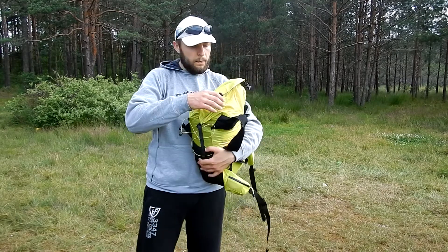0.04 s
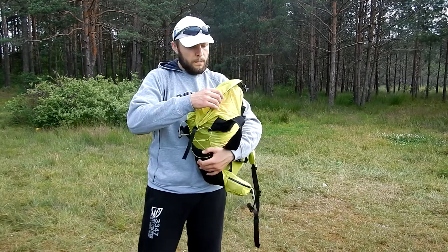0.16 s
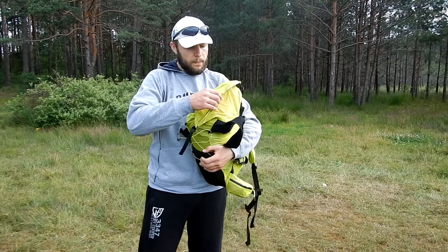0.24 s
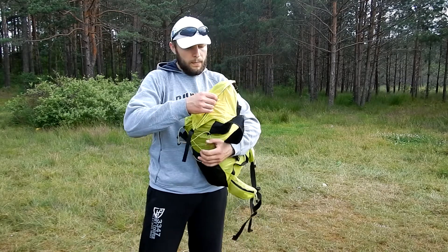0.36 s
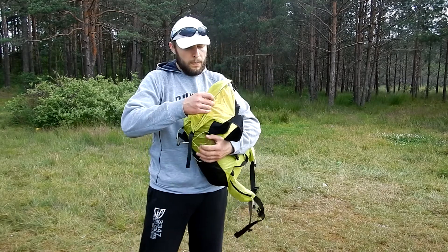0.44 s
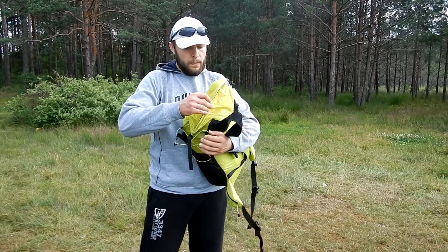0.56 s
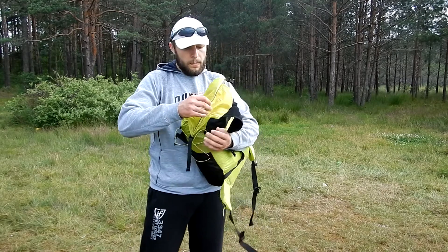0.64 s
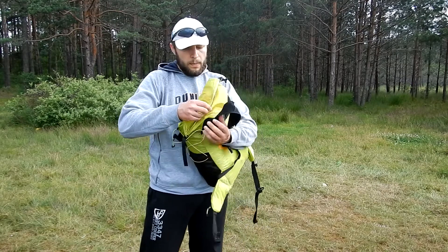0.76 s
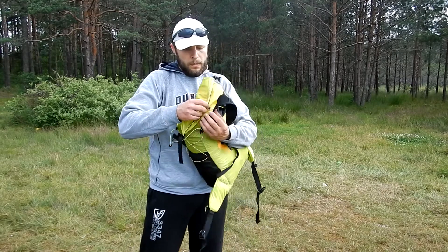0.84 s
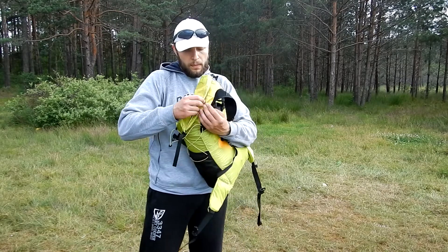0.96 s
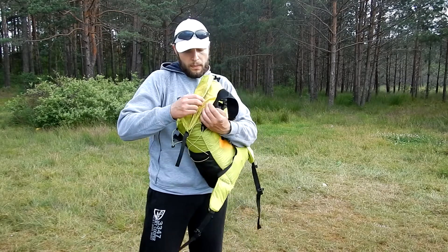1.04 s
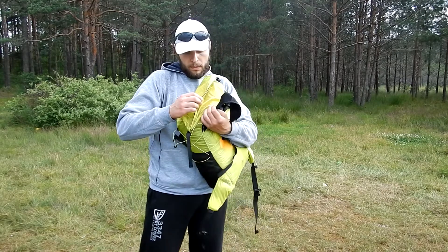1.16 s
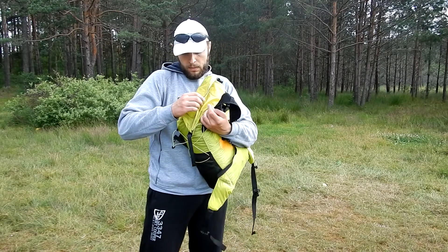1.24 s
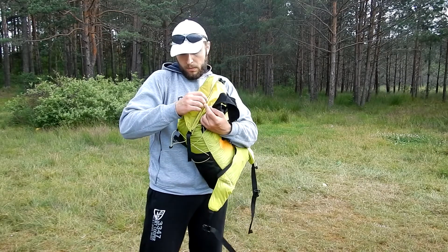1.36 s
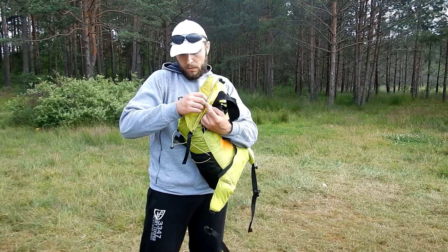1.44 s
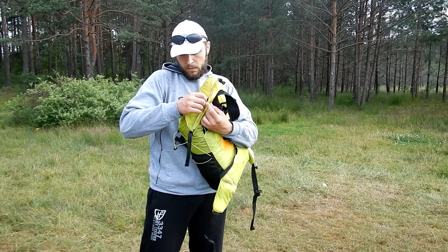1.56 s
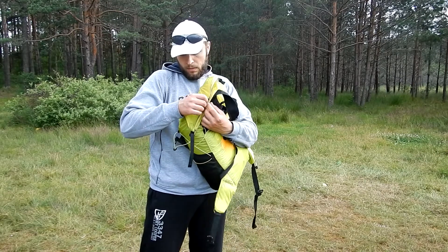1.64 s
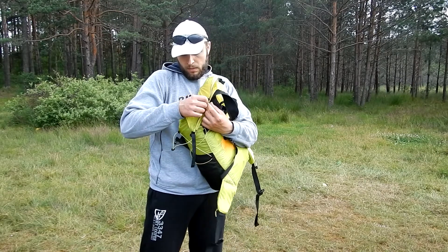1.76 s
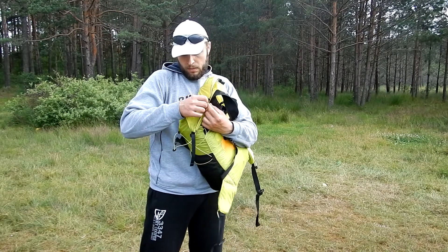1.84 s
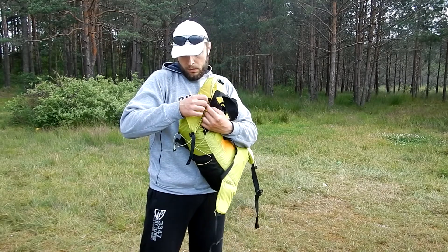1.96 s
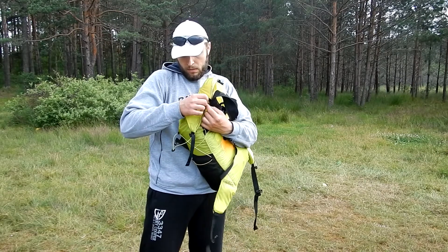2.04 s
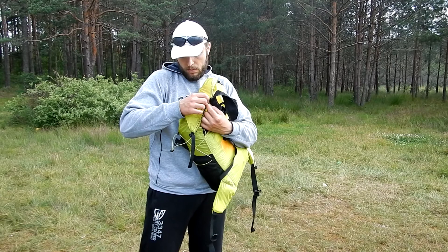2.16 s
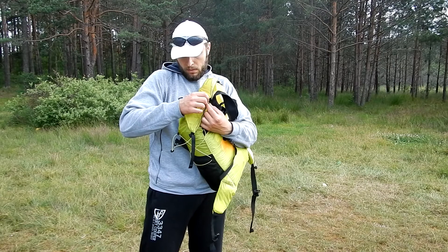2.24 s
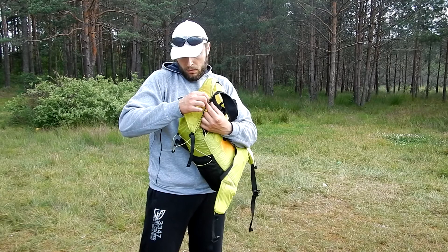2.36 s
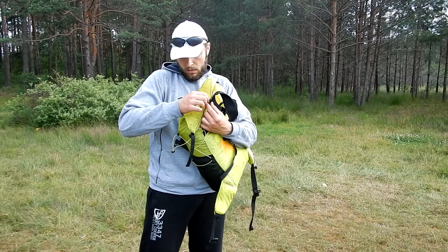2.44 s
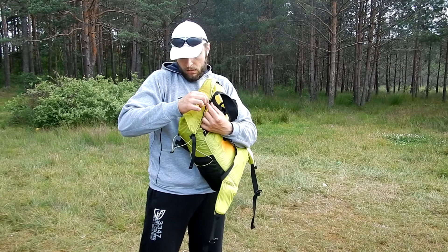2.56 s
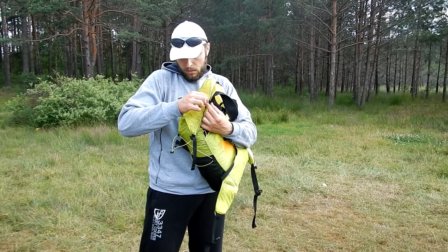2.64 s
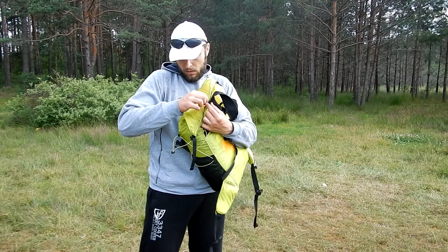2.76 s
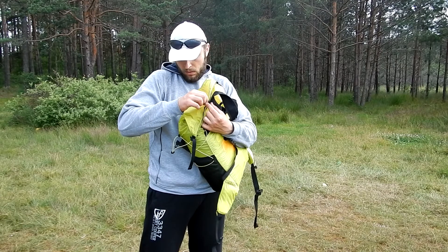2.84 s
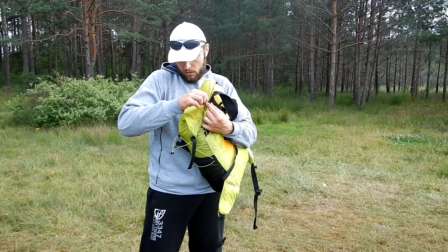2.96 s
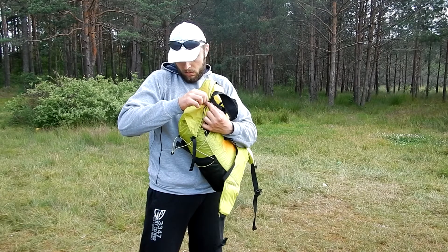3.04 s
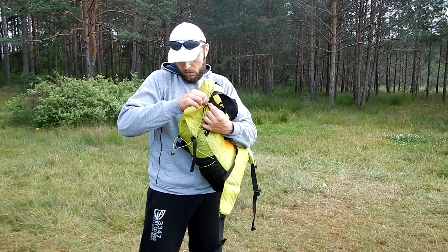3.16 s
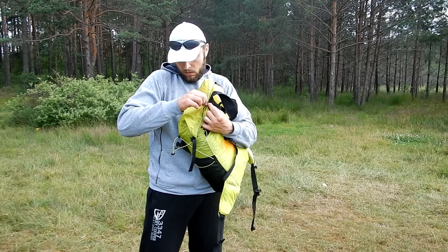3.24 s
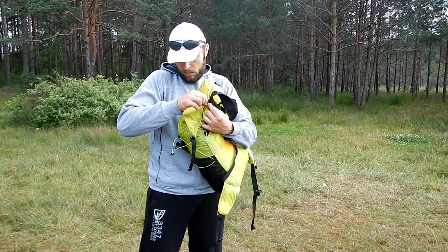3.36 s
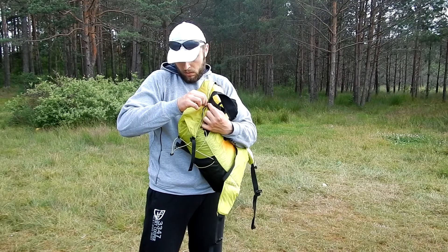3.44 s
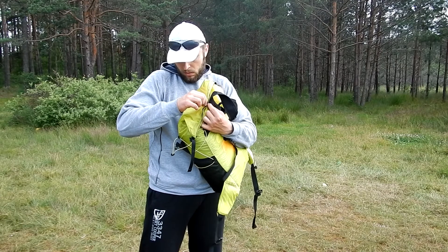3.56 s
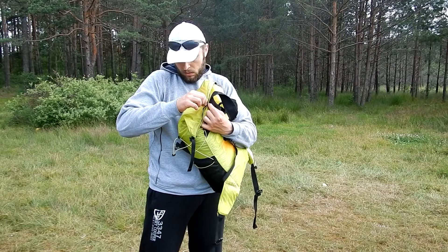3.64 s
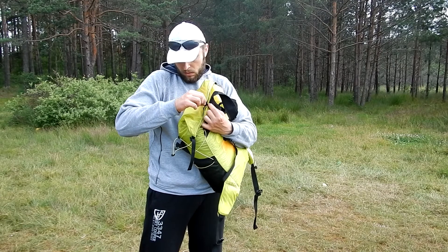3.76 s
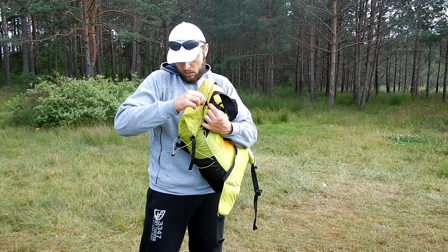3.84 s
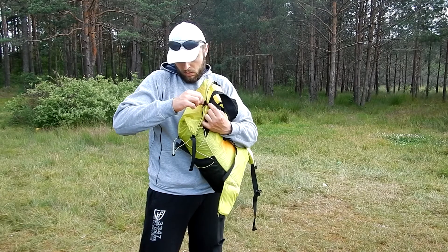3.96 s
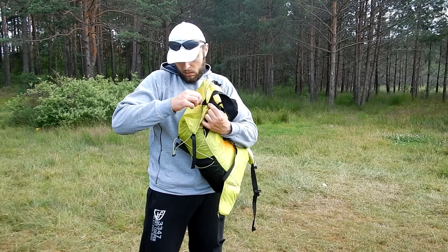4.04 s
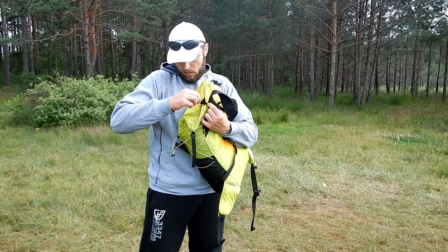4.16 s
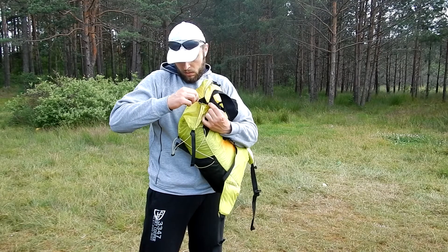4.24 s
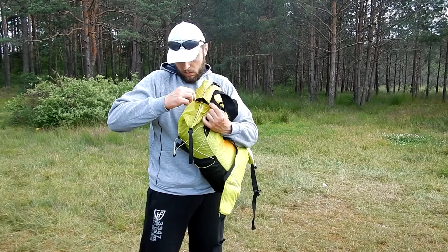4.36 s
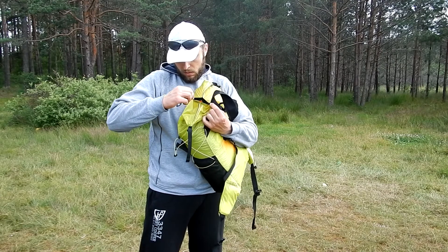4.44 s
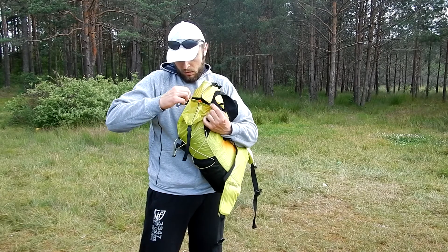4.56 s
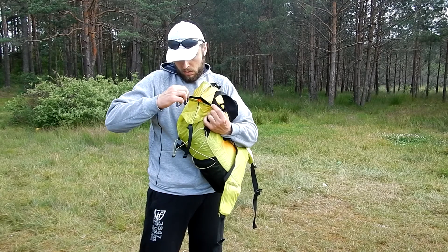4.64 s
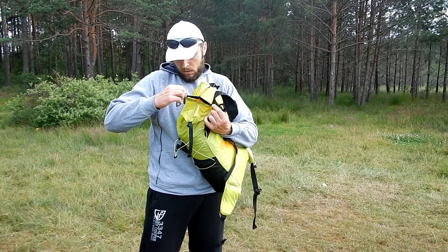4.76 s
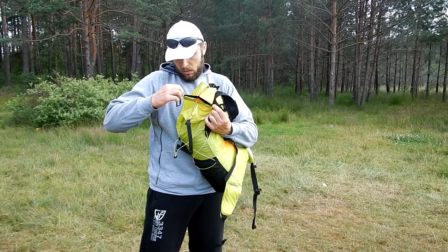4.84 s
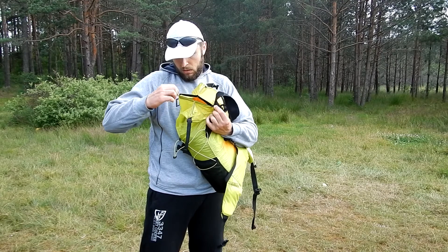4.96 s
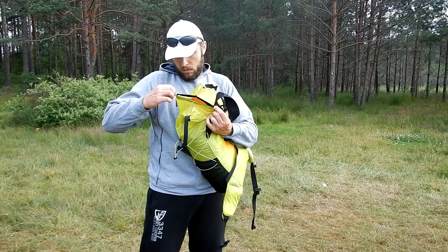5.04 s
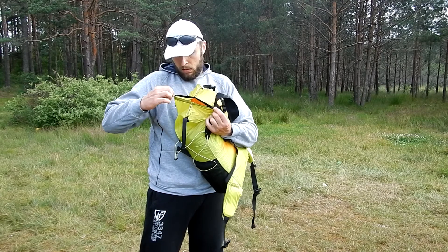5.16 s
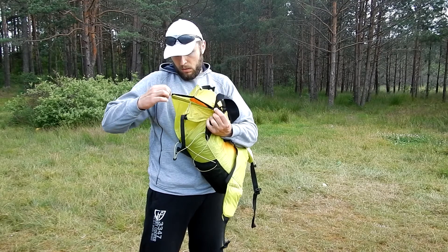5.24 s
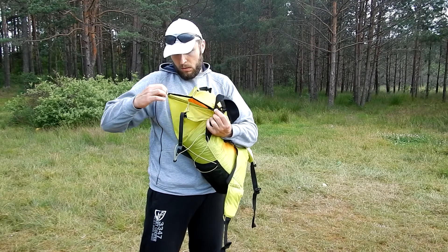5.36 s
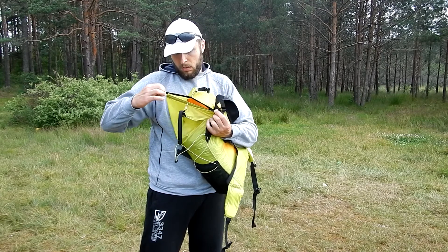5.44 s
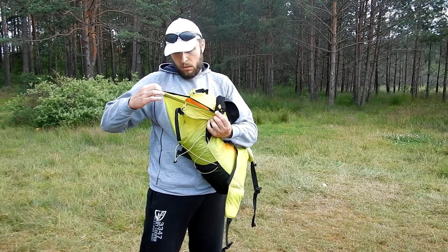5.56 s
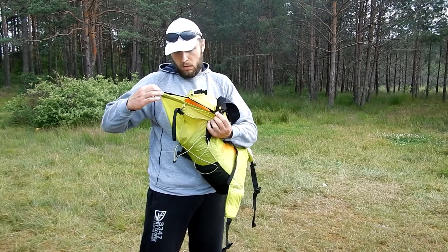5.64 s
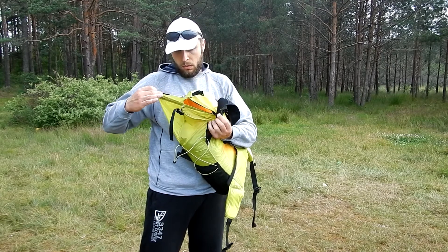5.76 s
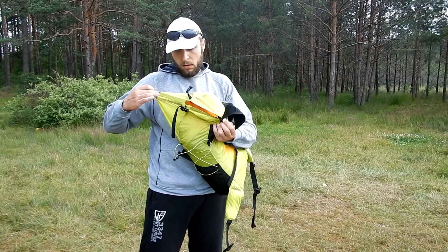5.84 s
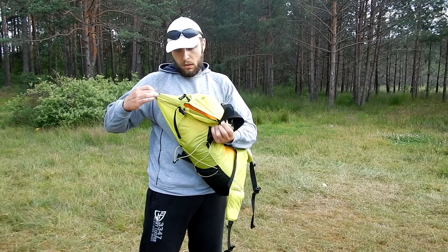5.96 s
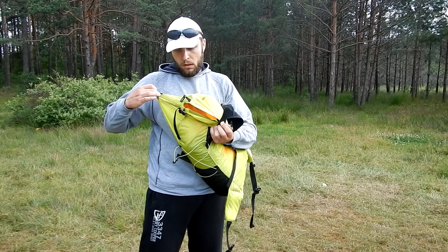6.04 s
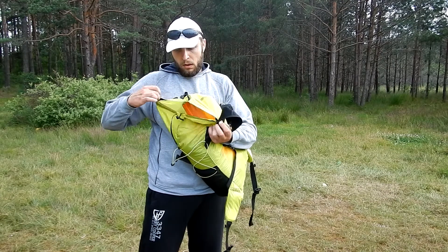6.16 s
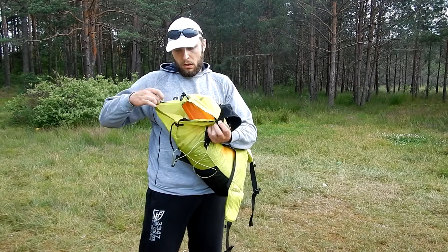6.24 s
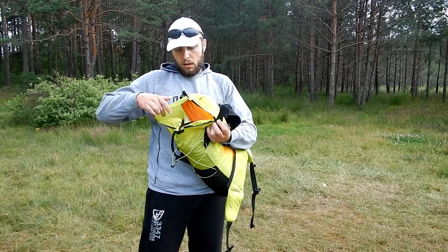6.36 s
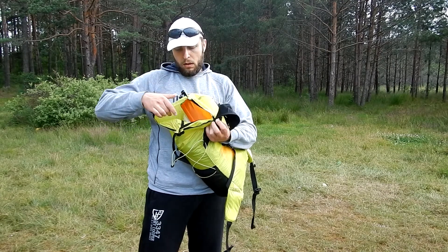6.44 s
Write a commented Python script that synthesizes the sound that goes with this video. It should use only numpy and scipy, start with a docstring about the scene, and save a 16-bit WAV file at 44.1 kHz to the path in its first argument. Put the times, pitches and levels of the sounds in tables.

```python
"""Backpack flap peeled open in a forest clearing

A nylon backpack is turned in the arms, then its hook-and-loop flap is peeled open. Fabric is dense noise grains.
Hooks are clicks through pitched resonances: first single snaps, then avalanches that rasp along
while the taut flap thrums like a drum skin. The loose flap slides off and settles.
The grass gives one quick echo and the trees a faint tail; filtered noise is the air, gliding sines a far bird."""
import sys
import numpy as np
from scipy import signal
from scipy.fft import rfft, irfft
from scipy.io import wavfile
from scipy.ndimage import uniform_filter1d

SR = 44100
rng = np.random.default_rng(int(sys.argv[2]) if len(sys.argv) > 2 else 0)


def int16_out(signal):
    """Quantize to a 16-bit WAV file."""
    q = np.round(np.clip(np.atleast_2d(signal).T, -1, 1) * 32767)
    wavfile.write(sys.argv[1], SR, q.astype(np.int16))


N = 286209
TIME = np.arange(N) / SR   # s

# Levels in the tables are settings ahead of each layer's filters and trims.
# hush of the trees: hz, level_db
FOREST_COLOUR = [(25, 4.5), (70, 6.5), (180, 3), (450, -0.5), (850, -0.5), (1250, -6), (2200, -10),
                 (2950, -12), (3700, -21.5), (5000, -14), (6000, -13.5), (6600, -28), (8000, -28),
                 (9200, -30), (15500, -36.5)]
# left-right likeness of the hush: hz, likeness (0-1)
FOREST_LIKENESS = [(60, 0.33), (120, 0.21), (250, 0.17), (510, 0.5), (1030, 0.31), (2100, 0.27), (4280, 0),
                   (8720, 0)]
# low rumble of wind on the microphone: hz, level_db
WIND_SPECTRUM = [(15, -10), (40, -8), (85, -7.5), (140, -30), (400, -39.5), (2000, -57.5)]
# gusts above the steady breeze: middle_s, length_s, level_db
WIND_GUSTS = [(.52, .28, -64), (1.0, .25, -68), (1.47, .4, -60), (1.94, .12, -63)]
# one soft bump on the microphone: start_s, level_db, pitch_hz, length_s
MIC_BUMP = (0.16, -42, 52, .062)
# whistles of the far bird: start_s, length_s, level_db
BIRD_CHIRPS = [(1.805, .05, -68), (2.035, .052, -64.5), (2.152, .115, -66.5), (2.273, .05, -65.5),
               (2.393, .055, -64.5), (2.61, .06, -71), (2.72, .05, -73), (2.91, .05, -74)]
# high swish of sliding threads, also the tick of a crease: hz, level_db
SWISH_COLOUR = [(1500, -28), (2900, 2.5), (3900, -6.5), (5200, 6.5), (6100, 1.5), (6700, 1.5), (8000, -2),
                (9000, -28.5), (12000, -43)]
# low rustle of the cloth, also the knock of a crease: hz, level_db
RUSTLE_COLOUR = [(80, -17.5), (200, 7.5), (400, 5.5), (1000, 6), (2100, 8.5), (3000, -7), (4500, -33),
                 (9000, -48.5)]
# nylon rubbing on nylon and sleeve as the pack is turned: time_s, swish_db, rustle_db
RUBBING_LEVELS = [(0, -67, -62.5), (.25, -60, -58.5), (.6, -62, -59.5), (.79, -53, -55), (.88, -59, -55.5),
                  (1.06, -56, -56.5), (1.16, -64, -63), (1.7, -69, -61), (1.95, -67.5, -66),
                  (2.2, -81, -86), (2.85, -77.5, -76), (3.6, -92, -102)]
# brief brushes of the hand: middle_s, length_s, level_db
HAND_BRUSHES = [(1.635, 0.24, -68.5), (2.44, 0.089, -74), (3.73, 0.03, -57), (6.135, 0.088, -65.5),
                (6.215, 0.098, -60.5)]
# creases popping and fingers tapping on the pack: start_s, level_db, knock_db (re that level)
CREASE_POPS = [(0.6566, -36, -4), (0.6867, -32.5, -3.5), (0.7554, -37.5, 3), (0.779, -28, -15),
               (0.7811, -23, -8), (0.816, -30, -18), (0.8366, -18.5, -14), (0.8473, -37, 4),
               (0.9501, -40, 1), (1.0301, -27, -21), (1.0868, -39, 0), (1.628, -33.5, -21),
               (1.934, -32, -9), (2.7012, -52, 3), (2.7714, -55, 7), (2.8407, -37, -16), (2.867, -32, -17),
               (2.9512, -55, 7), (3.0503, -40, -29), (3.1422, -52, 5), (3.2967, -55, 7), (3.355, -41, -25),
               (3.689, -36, -19), (5.9046, -22, -8), (5.9342, -33.5, 3), (5.9729, -36.5, 0),
               (6.2808, -45, 4)]
# brightness of freed hooks: hz, level_db
HOOK_COLOUR = [(200, -67), (1000, -20.5), (2200, -3), (3000, -0.5), (3800, -8.5), (4500, -4.5), (5300, 2),
               (5900, -0.5), (6600, -4), (7300, 0), (8100, -3), (9300, -22), (10800, -23.5), (11800, -59),
               (16000, -33)]
# body of the taut flap: hz, level_db
FLAP_COLOUR = [(60, -24.5), (150, -16.5), (280, -6), (400, -3.5), (800, -6), (1300, 0), (2200, 3.5),
               (2900, 1), (3700, -6), (5000, -24), (9000, -39)]
# strong hooks that snap: start_s, level_db, run_s (length of the run each sets off)
HOOK_SNAPS = [(3.7764, -31, .001), (3.784, -29.5, .002), (3.8173, -32.5, .0012), (3.868, -21.5, 0.0011),
              (3.875, -28, .001), (3.8837, -23, 0.0011), (3.8868, -20.5, 0.0025), (3.8932, -18, 0.0011),
              (3.9008, -23.5, .001), (3.9373, -25, .001), (3.941, -25, .001), (3.96, -20.5, .001),
              (3.965, -23, .001), (3.974, -12.5, 0.0024), (3.982, -12.5, 0.0027), (3.9892, -6.5, 0.0027),
              (4.013, -29, .001), (4.0167, -13, .001), (4.0283, -1.5, 0.0028), (4.0329, -4.5, 0.0037),
              (4.0462, -4, .0006), (4.0532, -12, 0.0033), (4.0696, -13, 0.00092), (4.0764, -15, .001),
              (4.084, -12, .002), (4.0918, -9.5, .0007), (4.1063, -12, .001), (4.1224, -14, 0.00078),
              (4.127, -17, 0.0041), (4.138, -16, 0.0056), (4.1489, -12, .003), (4.153, -14.5, 0.0047),
              (4.165, -17, .001), (4.17, -20.5, 0.0011), (4.185, -24, .003), (4.1917, -14, 0.0068),
              (4.2152, -16, .001), (4.218, -15, .001), (4.2222, -15, .002), (4.2306, -8, .005),
              (4.245, -12, .008), (4.2574, -14, .001), (4.2645, -9, 0.0032), (4.2692, -8, .003),
              (4.274, -7.5, 0.0037), (4.2824, -4, 0.0022), (4.2885, -13, .001), (4.2978, -9, .0023),
              (4.307, -12, 0.00089), (4.314, -9.5, 0.0035), (4.325, -12.5, 0.0023), (4.3326, -11, .001),
              (4.3372, -10, .001), (4.3791, -11, 0.00089), (4.41, -17, .001), (4.461, -15.5, .003),
              (4.5224, -16, 0.0027), (4.5358, -20, .001), (4.5504, -18, .001), (4.5975, -19, 0.0009),
              (4.6202, -21, .001), (4.741, -10.5, 0.0036), (4.831, -13, 0.0022), (4.8384, -16, .001),
              (4.8774, -10, 0.0049), (5, -13, 0.0011), (5.011, -10, 0.0023), (5.1042, -14, .001),
              (5.1545, -20, 0.0051), (5.1955, -18, .002), (5.24, -15.5, .002), (5.2702, -13, 0.0027),
              (5.3457, -17, .001), (5.3918, -13.5, 0.0013), (5.455, -15, .001), (5.5712, -21, .001),
              (5.626, -18, .001), (5.634, -24, .001), (5.6625, -22, .003), (5.745, -20, .001)]
# wandering pitch of the strong snaps: time_s, pitch_hz
SNAP_PITCHES = [(3.88, 6650), (4.03, 6960), (4.1, 6200), (4.14, 5240), (4.28, 5800), (4.85, 7250),
                (5.25, 6000)]
# brief ringing of the stiff strip after each snap: pitch_hz, width_hz, level_db
SNAP_RINGS = [(1940, 510, 0), (2890, 390, -6), (7250, 120, -1), (7670, 96, 9)]
# the pull along the strip: time_s, hook_db, hook_pitch_hz, lumpiness (0 = smooth, clipped at 1.2)
PULL_COURSE = [(4.215, -30.5, 5500, 1.2), (4.277, -27, 5370, 1.1), (4.33, -29, 5500, 1.1),
               (4.39, -29, 5320, 1), (4.48, -30.5, 5860, 0.7), (4.54, -30, 6720, 1),
               (4.66, -29, 7500, 0.78), (4.76, -28, 7610, 1), (4.84, -28.5, 8100, 0.92),
               (4.94, -30, 7100, 1), (5.01, -30, 6200, 0.87), (5.09, -31, 5670, 1), (5.22, -33, 5670, 1),
               (5.3, -29.5, 5730, 0.66), (5.42, -32.5, 5420, 1), (5.54, -31, 6100, 0.6),
               (5.64, -32, 5800, 0.8), (5.78, -30.5, 4930, 0.66), (5.858, -27.5, 5500, 0.45)]
# the peel catches on a stubborn row of hooks: release_s, length_s, drop_db
PEEL_STALLS = [(3.925, 0.024, 8), (3.947, .012, 11), (4.004, 0.015, 24), (4.247, 0.009, 10),
               (4.257, 0.0081, 13), (4.38, 0.0077, 16), (4.452, 0.011, 11), (4.602, 0.0029, 10),
               (4.582, 0.027, 14.5), (4.644, 0.018, 12), (4.712, .009, 9), (4.736, 0.0093, 9),
               (4.782, 0.021, 9), (4.798, 0.013, 8), (4.861, 0.013, 9.5), (5.067, 0.0055, 5),
               (5.119, 0.011, 9), (5.15, 0.024, 20), (5.193, 0.0333, 19), (5.209, 0.016, 7.5),
               (5.261, 0.012, 11.5), (5.2685, 0.0034, 5), (5.322, 0.011, 5), (5.391, 0.0087, 11),
               (5.456, .012, 7), (5.655, 0.009, 11), (5.715, 0.015, 9), (5.787, 0.027, 9),
               (5.8198, 0.02, 19.5)]
# moving ring of the taut strip: time_s, pitch_hz, level_db (re the hooks)
STRIP_RING_COURSE = [(4.25, 6160, -2), (4.5, 6400, -24.5), (4.82, 7700, -30), (4.93, 7100, 2),
                     (5.02, 6660, -4), (5.1, 6140, -5.5), (5.24, 5970, -2), (5.34, 5800, -1.5),
                     (5.46, 5640, -12), (5.56, 6200, -5), (5.8, 5750, -20)]
# main resonance of the flap, sinking overall as more comes free: time_s, pitch_hz, level_db (re the hooks)
FLAP_NOTE_COURSE = [(4.215, 2250, -8), (4.28, 1830, -9.5), (4.42, 1780, -21), (4.66, 1490, -9),
                    (4.82, 1320, -14.5), (4.97, 1080, -9), (5.32, 1090, -7.5), (5.58, 890, -9),
                    (5.74, 475, -12), (5.86, 594, -10)]
# growth of the flap's skin: full_db (re the hooks), lack_db (less at the start), growth_s
SKIN_GROWTH = (-10, 17.3, 0.072)
# growth of its low thrum: full_db (re the skin), lack_db (less at the start), growth_s
THRUM_GROWTH = (-5, 17, 0.29)
# narrow notches in the final tone: hz, width_hz
TONE_NOTCHES = [(2500, 203), (5000, 71), (7500, 76)]

FOREST_DB, BREEZE_DB = -62.5, -72.5
CHIRP_TOP_HZ, CHIRP_RISE_S = 3090, .021
CHIRP_RISE_HZ_PER_S, CHIRP_FALL_HZ_PER_S = 28000, 14000
CRACKLES_PER_S, CRACKLE_DB = 80, 13   # level re the thread catches
SLIDE_FROM_S, SLIDE_FADE_DB_PER_S = 5.862, 120
SLIDE_SWISH_DB, SLIDE_RUSTLE_DB = -46, -44.5
SETTLED_DB = -69   # rustle of the open pack
PRISE_FROM_S, PRISE_TO_S, SLIPS_PER_S = 3.3, 4.2, 260
PRISE_END_DB, PRISE_RISE_DB_PER_S = -41, 66
RUN_GAP_S, RUN_JITTER, RUN_DB = .0017, .61, -.5   # jitter as a share of the gap; level re the leading snap
STALL_FALL_S, STALL_RISE_S = .0027, .003
RELEASE_DIP_DB, RELEASE_DIP_S = -4, .0049
PULL_WAVER_DB = .5   # the hand pulls unsteadily
PULL_RISE_S, END_FADE_DB_PER_S = .001, 1300
STRIP_RING_WIDTH_HZ, FLAP_NOTE_WIDTH_HZ = 520, 420
GROUND_ECHO_S, ECHO_SWAY_S = .0046, .00007
GROUND_ECHO_DB, GRASS_CUT_HZ = -6.5, 1100
PAN_WAVER_DB = 1.6
CUTOFF_HZ = 15800


def from_db(db):
    """Decibels to gain."""
    return 10 ** (np.asarray(db) / 20)


def rms_one(x):
    """Scale to rms 1."""
    return x / np.sqrt(np.mean(x ** 2) + 1e-20)


def at_hz(points, hz):
    """Read a table on a log-frequency axis."""
    known, values = np.transpose(points)
    return np.interp(np.log(np.maximum(hz, 1)), np.log(known), values)


def in_time(rows):
    """One curve over time for each column after the first."""
    s, *columns = np.transpose(rows)
    return [np.interp(TIME, s, column) for column in columns]


def between(start_s, end_s):
    """1 from start to end, else 0."""
    return (TIME >= start_s) * (TIME < end_s)


def swells(rows):
    """Gain of smooth swells, each with a middle, a length and a level."""
    return sum(from_db(db) * np.cos(np.pi * np.clip((TIME - s) / length, -.5, .5))
               for s, length, db in rows)


def drift(rate):
    """Smooth chance of spread 1 that changes about rate times a second."""
    r = np.exp(-2 * np.pi * rate / SR)
    noise = rng.standard_normal(N + SR)
    return rms_one(signal.lfilter([1], [1, -2 * r, r * r], noise)[SR:])


def late(x, s):
    """Delay by s seconds."""
    return np.interp(TIME - s, TIME, x, left=0)


def clicks_at(times, heights):
    """Single clicks at the given times."""
    places = np.clip(np.ravel(times) * SR, 0, N - 1).astype(int)
    return np.bincount(places, np.ravel(heights), N)


def grains(per_s, spread_db):
    """Clicks at random moments, of random size and sign."""
    sizes = from_db(spread_db * np.clip(rng.standard_normal(N), -2, 2)) * rng.choice([-1, 1], N)
    return sizes * (rng.random(N) < per_s / SR)


def filtered(x, kind, order, hz):
    """Causal Butterworth filter."""
    return signal.sosfilt(signal.butter(order, hz, kind, fs=SR, output="sos"), x)


def coloured(x, spectrum, size=4096):
    """Causal (minimum-phase) filter with the given spectrum; it keeps the energy of a click."""
    hz = np.arange(size // 2 + 1) * SR / size
    cepstrum = irfft(np.log(from_db(at_hz(spectrum, hz))))
    # folding the cepstrum forward puts the energy as early as possible
    cepstrum[1:size // 2] *= 2
    cepstrum[size // 2 + 1:] = 0
    response = irfft(np.exp(rfft(cepstrum)))
    return signal.oaconvolve(x, response / np.linalg.norm(response))[:N]


def resonance(x, hz, width_hz):
    """Two-pole resonance with gain 1 on top."""
    r = np.exp(-np.pi * width_hz / SR)
    feed = np.array([1, 0, -1]) * (1 - r * r) / 2
    return signal.lfilter(feed, [1, -2 * r * np.cos(2 * np.pi * hz / SR), r * r], x + 1e-18)


def gliding(x, hz, width_hz):
    """A resonance whose centre follows a curve."""
    turn = np.exp(2j * np.pi * np.cumsum(hz) / SR)
    r = np.exp(-np.pi * width_hz / SR)
    # shift the centre down to zero, smooth, shift back up
    return 2 * np.real(turn * signal.lfilter([1 - r], [1, -r], x / turn + 1e-18))


def evened(x, window_s):
    """Hold the rms near 1 over a window; faster grain stays."""
    size = max(2, int(window_s * SR))
    power = uniform_filter1d(uniform_filter1d(x * x, size), size)
    return x / np.sqrt(np.abs(power) + 1e-4 * np.mean(x * x))


def air():
    """Steady hush of the trees, wind on the two microphone ports and one soft bump, from noise and a sine."""
    alike = np.clip(at_hz(FOREST_LIKENESS, np.arange(N // 2 + 1) * SR / N), 0, 1)
    mid, side = rfft(rng.standard_normal((2, N)))
    mid = coloured(irfft(mid, N), FOREST_COLOUR)
    side = coloured(irfft(side * np.sqrt((1 - alike) / (1 + alike)), N), FOREST_COLOUR)
    hush = from_db(FOREST_DB) * (mid + from_db(-1.0) * side * [[1], [-1]])
    buffets = np.array([coloured(rng.standard_normal(N), WIND_SPECTRUM) * from_db(3.5 * drift(6))
                        for port in range(2)])
    wind = (from_db(BREEZE_DB) + swells(WIND_GUSTS)) * buffets
    s, db, hz, length = MIC_BUMP
    arch = np.sin(np.pi * np.clip((TIME - s) / length, 0, 1)) ** 2
    bump = from_db(db) * arch * np.sin(2 * np.pi * hz * (TIME - s))
    return hush + wind + bump


def bird():
    """Arched whistles: each rises briefly towards the same wavering top note, then falls until it ends."""
    out, waver = np.zeros(N), 1 + .025 * drift(250)
    for s, length, db in BIRD_CHIRPS:
        age = np.clip(TIME - s, 0, length)
        below_hz = np.maximum(CHIRP_RISE_HZ_PER_S * (CHIRP_RISE_S - age),
                              CHIRP_FALL_HZ_PER_S * (age - CHIRP_RISE_S))
        pitch_hz = (CHIRP_TOP_HZ - below_hz) * waver
        whistle = np.sin(2 * np.pi * np.cumsum(pitch_hz) / SR)
        out += from_db(db) * np.sin(np.pi * age / length) * whistle
    return out


def trees(x, t60, top_hz):
    """Trunks scatter a thin tail, different at each ear: decaying noise with its treble dulled."""
    t = TIME[:SR]
    tails = rng.standard_normal((2, SR)) * from_db(-60 * t / t60) * (1 - np.exp(-t / .006))
    tails = filtered(tails, "low", 1, min(top_hz, .4 * SR))
    return np.array([signal.oaconvolve(x, tail / np.linalg.norm(tail))[:N] for tail in tails])


def over_grass(x):
    """The ground returns a dull echo whose delay sways as the hands move."""
    echo = late(x, GROUND_ECHO_S + ECHO_SWAY_S * drift(1.6))
    return x + from_db(GROUND_ECHO_DB) * filtered(echo, "low", 1, GRASS_CUT_HZ)


def placed(x, treble_pan_db, lag_s):
    """The left port hears the treble louder and slightly sooner; each burst radiates a little differently."""
    pan_db = treble_pan_db + PAN_WAVER_DB * drift(60)
    treble = signal.sosfiltfilt(signal.butter(2, 5800, "high", fs=SR, output="sos"), x)
    left = from_db(pan_db / 2) * treble
    right = from_db(-pan_db / 2) * late(treble, lag_s)
    # short waves are scattered differently to each port
    short = filtered(x, "high", 2, 2500)
    scatter = np.array([0.26 * late(short, 0.000852), 0.049 * late(short, 0.000325)])
    return x - treble + np.array([left, right]) + scatter


def fabric():
    """Threads slip over one another in dense tiny catches: a high swish with a fine crackle, and a rustle."""
    swish_db, rustle_db = in_time(RUBBING_LEVELS)
    # the loose flap slides off the pack and comes to rest
    loose = TIME > SLIDE_FROM_S
    slide = loose * from_db(-SLIDE_FADE_DB_PER_S * np.abs(TIME - SLIDE_FROM_S))
    swish_gain = from_db(swish_db) + from_db(SLIDE_SWISH_DB) * slide + swells(HAND_BRUSHES)
    rustle_gain = from_db(rustle_db) + from_db(SLIDE_RUSTLE_DB) * slide + from_db(SETTLED_DB) * loose
    catches = grains(3500, spread_db=1.0) * from_db(1.4 * drift(48))
    crackle = from_db(CRACKLE_DB) * grains(CRACKLES_PER_S, spread_db=2.0)
    swish = swish_gain * evened(coloured(catches + crackle, SWISH_COLOUR), window_s=0.14)
    rustle = rustle_gain * evened(coloured(catches, RUSTLE_COLOUR), window_s=0.23)
    return from_db(-1.5) * (swish + rustle)


def creases(count=5):
    """Buckling creases and finger taps: one tick, a short crumple of weaker ticks, and a low knock."""
    s, db, knock_db = np.transpose(CREASE_POPS)
    shape = (len(s), count)
    times = s[:, None] + 0.001 * rng.exponential(1, shape) * (np.arange(count) > 0)
    sizes = from_db(db[:, None] - 7 * np.arange(count)) * rng.choice([-1, 1], shape)
    tick = from_db(-4.0) * coloured(clicks_at(times, sizes), SWISH_COLOUR)
    knocks = clicks_at(times, sizes * from_db(knock_db[:, None]))
    return tick + from_db(8.5) * coloured(knocks, RUSTLE_COLOUR)


def hooks(clicks, pitch_hz, spread_octaves, width_hz, count=10):
    """Each freed hook flicks for a few cycles at its own pitch, scattered around the common pitch."""
    pitches = np.geomspace(3000, 8600, count)
    own = np.log2(pitch_hz) + spread_octaves * rng.standard_normal(N)
    # deal every click to the nearest of a few fixed resonances
    dealt = np.rint(np.interp(own, np.log2(pitches), np.arange(count)))
    flicks = sum(resonance(clicks * (dealt == k), hz, width_hz) for k, hz in enumerate(pitches))
    return coloured(flicks, HOOK_COLOUR)


def stalls():
    """Level in dB as the peel catches and falls quiet, then comes free with a brief smaller dip."""
    db = np.zeros(N)
    for s, length, drop_db in PEEL_STALLS:
        near = slice(int((s - .08) * SR), int((s + .08) * SR))
        age = TIME[near] - s
        caught = np.clip((age + length) / STALL_FALL_S, 0, 1)
        freed = np.clip(age / STALL_RISE_S + .5, 0, 1)
        release_dip_db = freed * RELEASE_DIP_DB * np.exp(-np.abs(age) / RELEASE_DIP_S)
        db[near] += release_dip_db - (1 - freed) * caught * drop_db
    return db


def prising(stall_db):
    """Weak hooks slip one at a time between the snaps, louder as the strain builds."""
    slips = grains(SLIPS_PER_S, spread_db=4.5)
    flicks = rms_one(hooks(slips, pitch_hz=5000, spread_octaves=0.65, width_hz=2240))
    crackle = flicks + from_db(-14.5) * rms_one(coloured(slips, FLAP_COLOUR))
    strain_db = PRISE_END_DB - PRISE_RISE_DB_PER_S * np.abs(PRISE_TO_S - TIME)
    return between(PRISE_FROM_S, PRISE_TO_S) * from_db(strain_db + stall_db) * crackle


def snaps(count=8):
    """A strong hook snaps and may set off a short run of others; weak neighbours give way around it."""
    s, db, run_s = np.transpose(HOOK_SNAPS)[:, :, None]
    shape = (len(s), count)
    steps = RUN_GAP_S * (np.arange(1, count + 1) + RUN_JITTER * rng.uniform(-1.248, 1, shape))
    in_run = np.clip((run_s - steps) / RUN_GAP_S + .5, 0, 1)
    run = from_db(db + RUN_DB) * in_run * rng.choice([-1, 1], shape)
    strong = clicks_at(s, from_db(db) * rng.choice([-1, 1], s.shape)) + clicks_at(s + steps, run)
    waits = .0018 * rng.exponential(1, shape) - .0008
    weak = clicks_at(s + waits, from_db(db - 16.5) * rng.standard_normal(shape))
    pulses = strong + weak
    pitch_hz = in_time(SNAP_PITCHES)[0] * 2 ** (.07 * drift(100))
    flicks = from_db(12.0) * coloured(gliding(strong, pitch_hz, 1400), HOOK_COLOUR)
    flicks += from_db(15.0) * hooks(weak, pitch_hz=6500, spread_octaves=0.089, width_hz=1340)
    ring = sum(from_db(ring_db) * resonance(pulses, hz, width_hz) for hz, width_hz, ring_db in SNAP_RINGS)
    ring = filtered(ring, "low", 6, 8600)
    snap = flicks + ring + from_db(-41.5) * coloured(pulses, FLAP_COLOUR)
    return filtered(snap, "low", 2, 12500)


def avalanches(per_s, fade_s):
    """Level in dB of a chain of small collapses that swell and die away; a row holds only so many hooks."""
    fade = np.exp(-1 / (fade_s * SR))
    flow = signal.lfilter([1], [1, -fade], np.abs(grains(per_s, spread_db=6.0)))
    db = 20 * np.log10(np.abs(uniform_filter1d(flow, SR // 1000)) + .3)
    return 9 * np.tanh((db - db.mean()) / 9)   # stays within 9 dB either way


def grown(full_db, lack_db, growth_s):
    """Gain that rises towards its full value as more of the flap comes free."""
    age = np.maximum(TIME - PULL_COURSE[0][0], 0)
    return from_db(full_db - lack_db * np.exp(-age / growth_s))


def peel(stall_db):
    """Hooks let go in avalanches a few ms long, which ring the strip and pluck the flap; stalls dull the rasp."""
    hook_db, pitch_hz, lumpiness = in_time(PULL_COURSE)
    ring_hz, ring_db = in_time(STRIP_RING_COURSE)
    note_hz, note_db = in_time(FLAP_NOTE_COURSE)
    onset = np.clip((TIME - PULL_COURSE[0][0]) / PULL_RISE_S, 0, 1)
    peeling = onset * from_db(-END_FADE_DB_PER_S * np.maximum(TIME - PULL_COURSE[-1][0], 0))
    surge_db = np.clip(lumpiness, 0, 1.2) * avalanches(per_s=520, fade_s=.0011)
    surge = from_db(surge_db)
    pulses = grains(2200, spread_db=6.0) * surge
    plucks = grains(2200, spread_db=1.5) * surge

    # neighbouring hooks are alike, so the common pitch drifts along the row
    row_hz = pitch_hz * 2 ** (.11 * drift(120))
    flicks = evened(hooks(pulses, row_hz, spread_octaves=0.17, width_hz=2060), window_s=0.014)
    ring = gliding(grains(3800, spread_db=4.0) * surge, ring_hz, STRIP_RING_WIDTH_HZ)
    ring = filtered(evened(ring, window_s=0.0206), "band", 4, [3500, 8600])
    rasp = flicks + from_db(ring_db) * ring

    skin = evened(coloured(plucks + .5 * pulses, FLAP_COLOUR), window_s=0.017)
    thrum = coloured(grains(1200, spread_db=2.5) * from_db(1.3 * surge_db), FLAP_COLOUR)
    thrum = evened(resonance(thrum, 395, 546), window_s=0.025)
    # the flap's tension flutters, and its note with it
    note_hz = note_hz * 2 ** (.3 * drift(45))
    note_db = note_db + drift(30)
    note = coloured(grains(1500, spread_db=3.0) * surge, FLAP_COLOUR)
    note = evened(gliding(note, note_hz, FLAP_NOTE_WIDTH_HZ), window_s=0.037)
    flap = grown(*SKIN_GROWTH) * (skin + grown(*THRUM_GROWTH) * thrum) + from_db(note_db) * note

    return peeling * from_db(hook_db + stall_db + PULL_WAVER_DB * drift(3.4)) * (rasp + flap)


def scene():
    """The pack in front of the microphone, the bird deep among the trees."""
    stall_db = stalls()
    opening = prising(stall_db) + snaps() + peel(stall_db)
    pack = over_grass(opening) + fabric() + creases()
    song = bird()
    near = placed(pack, treble_pan_db=6.0, lag_s=.000022)
    near = near + from_db(-26.5) * trees(pack, t60=0.16, top_hz=4980)
    far = from_db(-1.5) * song + from_db(-7) * trees(song, t60=.35, top_hz=4000)
    return near + far + air()


def record(dry):
    """Three narrow notches ring briefly after clicks; overload is clipped and the top is cut."""
    for hz, width_hz in TONE_NOTCHES:
        dry = signal.lfilter(*signal.iirnotch(hz, hz / width_hz, fs=SR), dry)
    out = np.clip(dry, -.88, .88)
    return signal.sosfilt(signal.cheby2(12, 60, CUTOFF_HZ, fs=SR, output="sos"), out)


dry = scene()
out = record(dry)
int16_out(out)
```